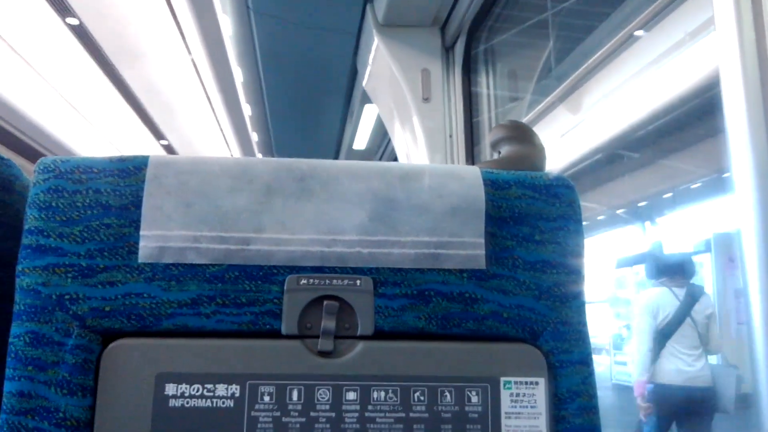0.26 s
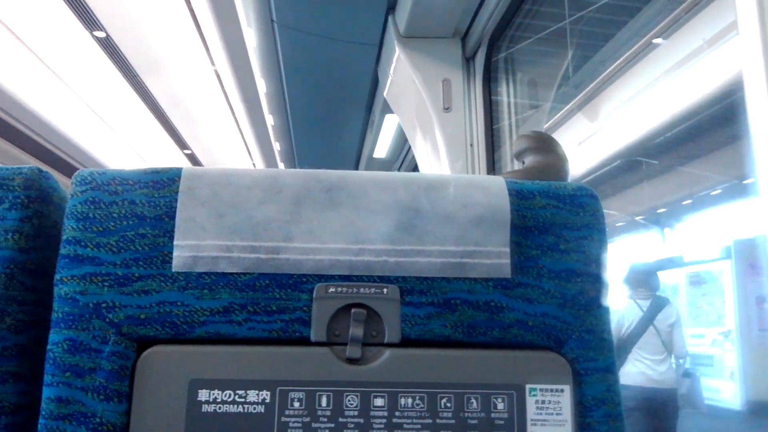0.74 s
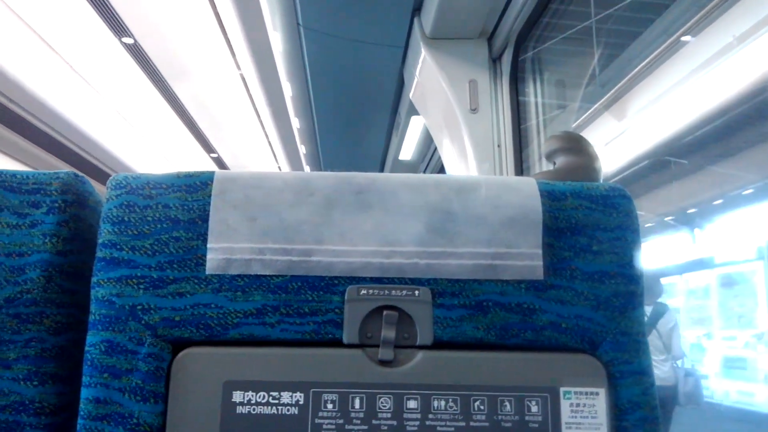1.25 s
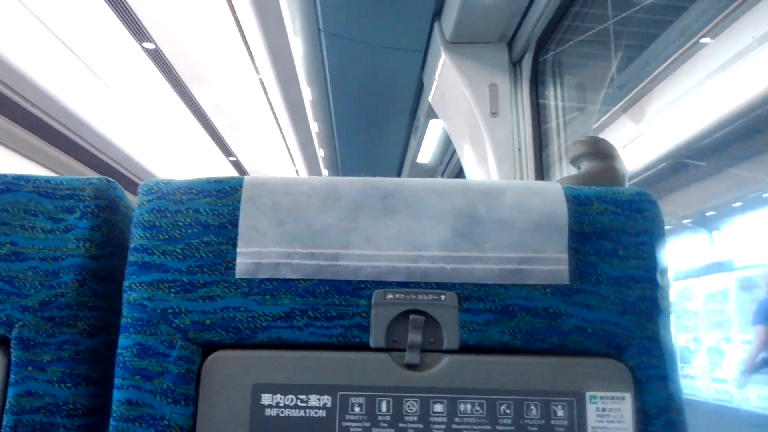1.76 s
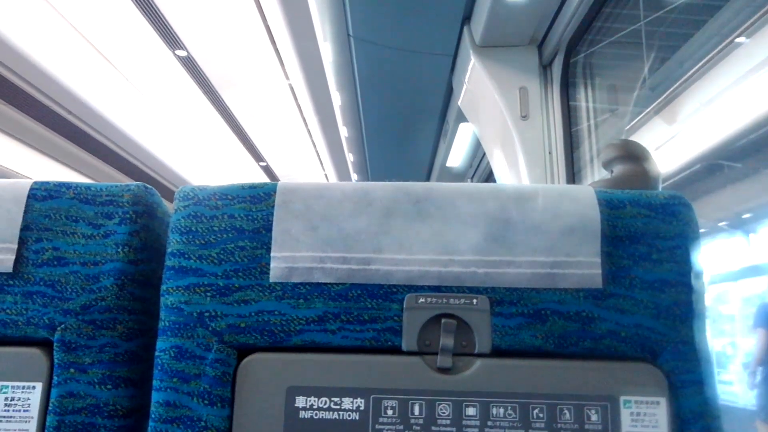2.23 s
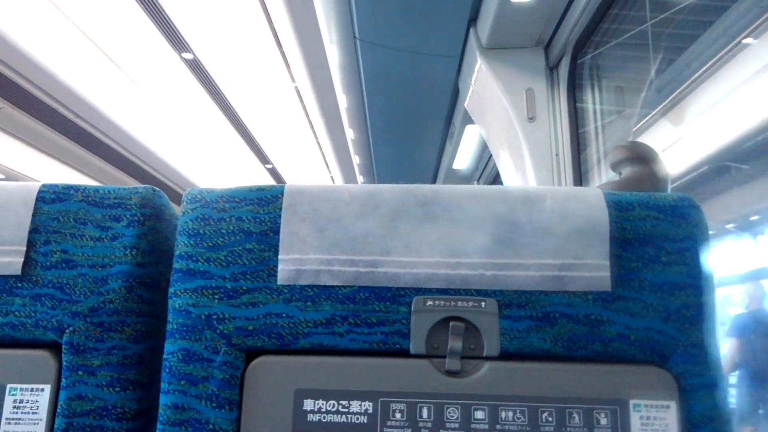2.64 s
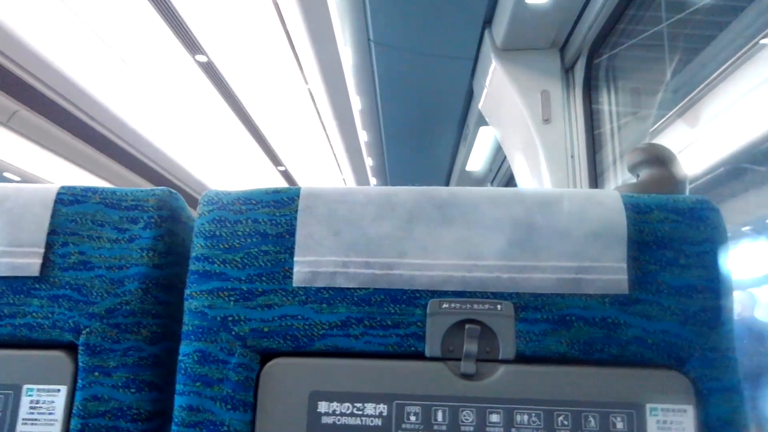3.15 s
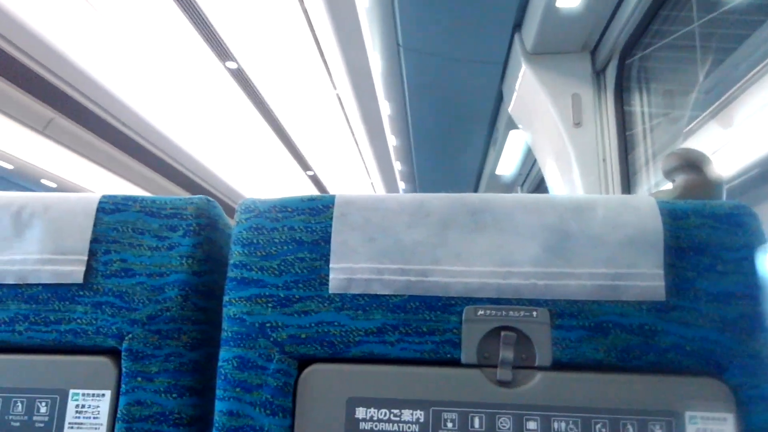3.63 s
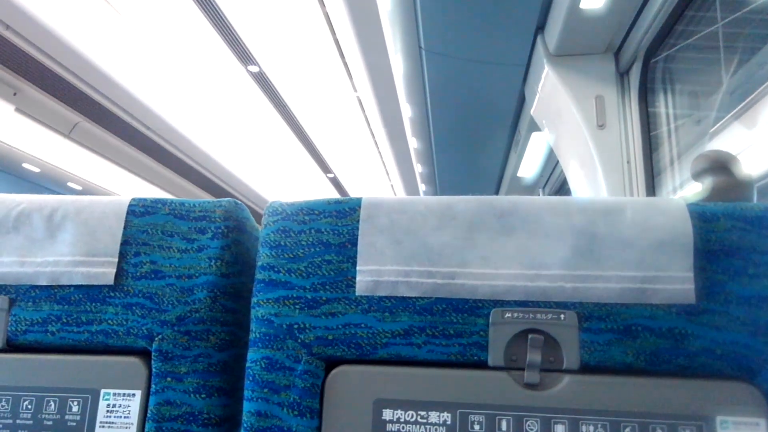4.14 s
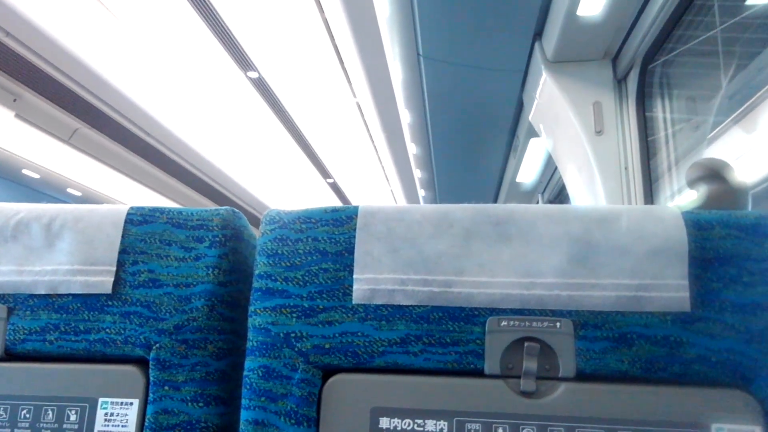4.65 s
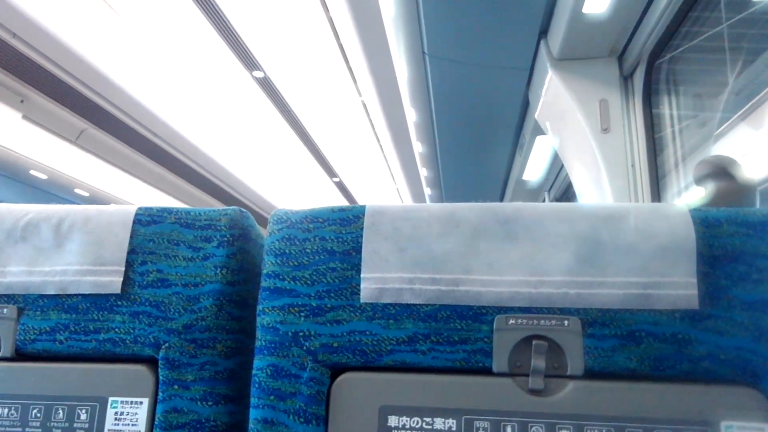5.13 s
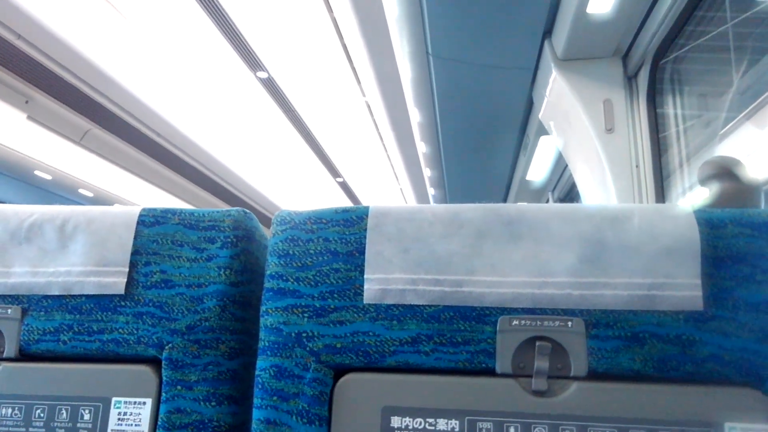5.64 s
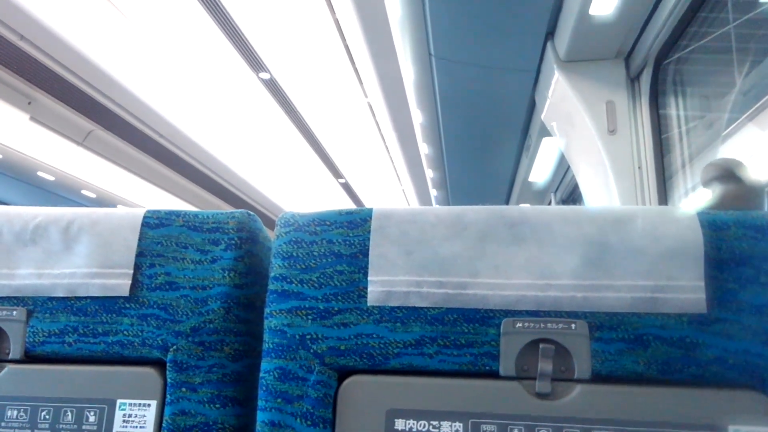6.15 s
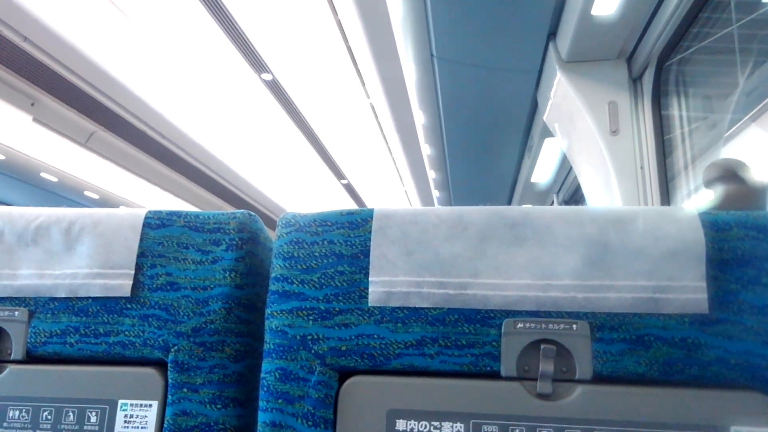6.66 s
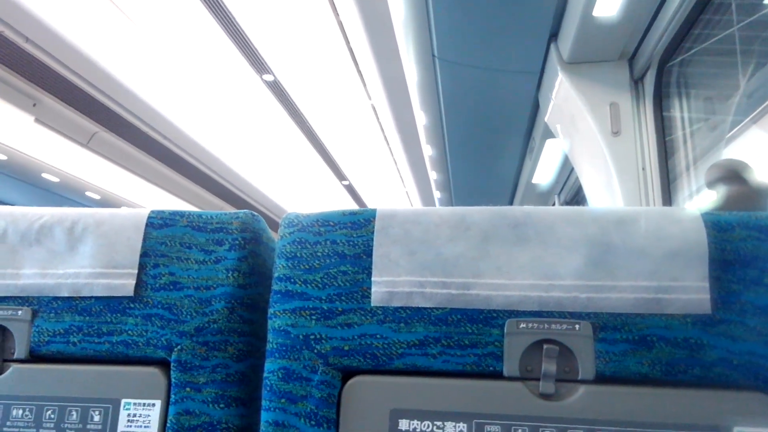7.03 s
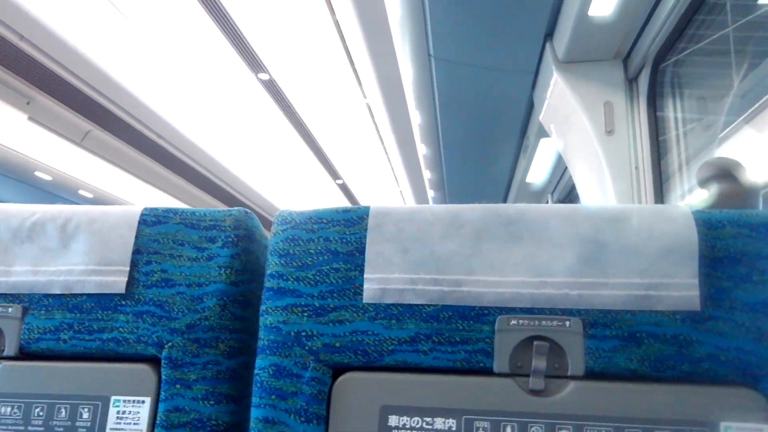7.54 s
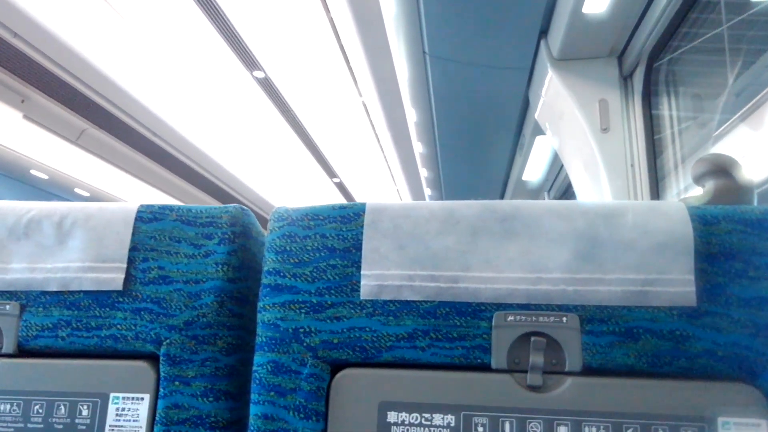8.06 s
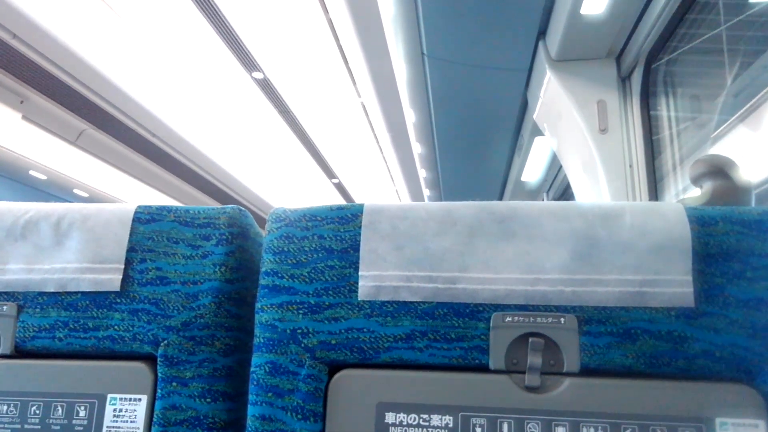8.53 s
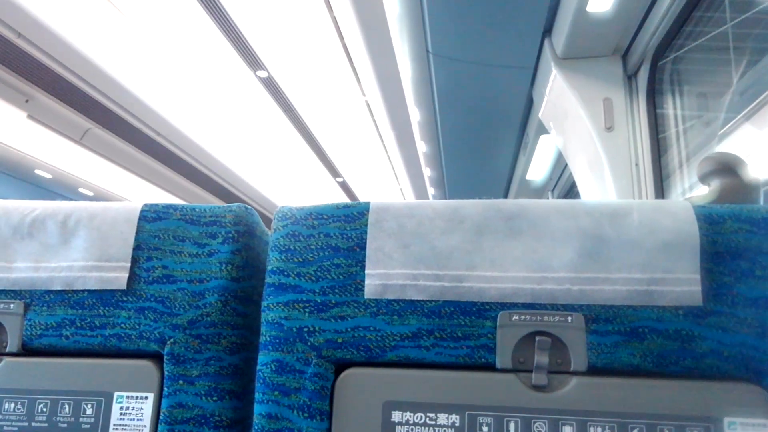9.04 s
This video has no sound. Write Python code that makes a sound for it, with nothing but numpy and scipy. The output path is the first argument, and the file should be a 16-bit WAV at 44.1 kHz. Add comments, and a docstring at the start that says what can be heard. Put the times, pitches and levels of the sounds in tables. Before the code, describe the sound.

A steady low hum fills the cabin of a stationary electric train for about nine seconds, heard from one microphone inside. Fan and compressor motors drone under the floor, slowly swelling and easing over a deep body rumble. Air rushes softly through the ceiling ducts, and a very faint high electrical whine sits far behind. From the start until about 5.5 seconds, cloth rustles quietly close by and small things tick irregularly, a little more clearly around 0.4, 2 and 2.9 seconds. At 5.3 seconds something knocks once, sharply, on a panel, with a brief cabin echo. Only a few faint ticks follow. From 8.5 seconds a light metal part makes four short, quiet scrapes, the last two slightly lower, along with one last soft rustle. The hum grows slightly stronger toward the end.

```python
"""Inside a standing electric train car, one microphone. From the start, fan and compressor motors
drone under the floor, the body rumbles, air rushes through the ceiling ducts and an inverter whines
faintly. Close by, cloth rustles as its fibres slip, and small things tick. At 5.3 s something knocks
once on a panel and the cabin echoes briefly. From 8.5 s a light metal part scrapes four times,
friction exciting its resonances, with one last rustle."""
import sys
import numpy as np
from scipy import signal
from scipy.fft import rfft, irfft, next_fast_len
from scipy.io import wavfile
from scipy.ndimage import uniform_filter1d

SR = 44100
rng = np.random.default_rng(int(sys.argv[2]) if len(sys.argv) > 2 else 0)


def inscribe(sig):
    """Save sig as 16-bit PCM at rate SR to the path in sys.argv[1].

    A 1-D sig is mono; a 2-D sig holds one channel per row.
    Samples are clipped to [-1, 1] before scaling.
    """
    pcm = np.round(np.clip(np.atleast_2d(sig).T, -1, 1) * 32767)
    wavfile.write(sys.argv[1], SR, pcm.astype(np.int16))


N = 409688


def undb(db):
    """Gain of a level in dB."""
    return 10 ** (np.asarray(db) / 20)


def unit(x):
    """x scaled to rms 1."""
    return x / np.sqrt(np.mean(x ** 2))


def colour(x, spectrum, bumps=()):
    """x shaped by (Hz, dB) points and (Hz, width Hz, dB) bells; white noise keeps its rms."""
    size = next_fast_len(N)
    hz = np.maximum(np.arange(size // 2 + 1) * SR / size, .1)
    points_hz, points_db = np.transpose(spectrum)
    shape_db = np.interp(np.log(hz), np.log(points_hz), points_db, left=-90, right=-90)
    for centre_hz, width_hz, bump_db in bumps:
        shape_db += bump_db / (1 + (2 * (hz - centre_hz) / width_hz) ** 2)
    return irfft(rfft(x, size) * unit(undb(shape_db)), size)[:N]


def wander(per_s):
    """A smooth random curve of rms 1, drawn through per_s values a second."""
    hold = int(SR / per_s)
    steps = np.repeat(rng.standard_normal(N // hold + 1), hold)
    return unit(uniform_filter1d(uniform_filter1d(steps, hold), hold)[:N])


def sine(hz, drift_hz=0.):
    """A tone of rms 1 whose pitch may wander."""
    turns = np.cumsum(hz + drift_hz * wander(2.)) / SR
    return np.sqrt(2) * np.sin(2 * np.pi * (turns + rng.random()))


def add(out, start_s, piece):
    """Mixes a piece into out at start_s."""
    i = int(start_s * SR)
    out[i:i + len(piece)] += piece[:N - i]


# The two strong drones under the floor. Each row: time in seconds, low and high drone in dB rms.
DRONE_LEVELS = [(0.0, -29.5, -25.5), (1.25, -27.5, -26.0), (1.7, -30, -27), (2.3, -30.5, -30.5),
                (3.1, -31.0, -31.5), (4.1, -31, -27), (5.2, -29, -26.5), (5.9, -31.5, -28), (7.5, -34, -28),
                (8.5, -33.5, -24.5), (9.29, -33, -23.5)]
# Weaker machine tones. Each row: frequency in Hz, level in dB, waver in dB.
MACHINE_TONES = [(31.22, -50, 2), (114.05, -47, 1.5), (114.85, -49.5, 1.5), (116.6, -54, 2),
                 (174.9, -57, 2), (229.7, -61, 3), (344.3, -74, 3), (360.0, -73, 2), (1003.1, -76, 2),
                 (1004.25, -75, 2)]


def motors(low_hz=29.52, high_hz=58.32):
    """Under the floor, fan and compressor motors swell slowly; close pairs of weaker tones throb."""
    t = np.arange(N) / SR
    times, low_db, high_db = np.transpose(DRONE_LEVELS)
    weak = sum(undb(db + waver_db * wander(1.6)) * sine(hz, drift_hz=0.083)
               for hz, db, waver_db in MACHINE_TONES)
    low = undb(np.interp(t, times, low_db)) * sine(low_hz)
    high = undb(np.interp(t, times, high_db)) * sine(high_hz)
    return low + high + weak


# The body's deepest sway, then the rumble above it. Each row: frequency in Hz, relative level in dB.
SWAY_SPECTRUM = [(3, -25), (7, -2), (20, 0), (40, -5), (50, -4), (62, -9)]
RUMBLE_SPECTRUM = [(76, -4), (95, -13.5), (135, -5), (175, -13), (210, -19.5), (300, -24), (420, -32),
                   (600, -40.5)]


def car_body(level_db=-36):
    """All around the microphone, the car body sways and rumbles almost steadily."""
    gain = undb(level_db + .5 * wander(0.74))
    return gain * colour(rng.standard_normal(N), SWAY_SPECTRUM + RUMBLE_SPECTRUM)


# Air flow and microphone hiss. Each row: frequency in Hz, relative level in dB.
AIR_SPECTRUM = [(300, -11.5), (600, -8), (760, 0), (1000, -3), (1300, -5.5), (2000, -7), (2600, -10.5),
                (3500, -17.5), (4500, -21.5), (5600, -24), (7000, -32), (10000, -39.5), (11700, -35),
                (13500, -36.5), (16000, -36.5)]
# Duct resonances and dips. Each row: centre in Hz, width in Hz, gain in dB.
DUCT_RESONANCES = [(1113, 68, 8.5), (1133.5, 30, -14), (1224, 41, 5), (1362, 56, -10.5), (1517, 150, 3.5),
                   (1648, 100, -4.5), (1930, 62, 1.5)]


def duct_air(level_db=-55):
    """Overhead, rushing air takes on the resonances of the ducts; its level wanders a little."""
    gain = undb(level_db + 0.3 * wander(2.3) + 0.72 * wander(7.7))
    return gain * colour(rng.standard_normal(N), AIR_SPECTRUM, DUCT_RESONANCES)


# Soft, hard and soft contacts of one knock. Each row: start in seconds, level in dB, contact in seconds.
KNOCK_BLOWS = [(5.282, -23.5, 0.0037), (5.301, -35, .0002), (5.311, -26, .003)]
# The struck panel. Each row: frequency in Hz, relative level in dB, seconds to fall 60 dB.
PANEL_MODES = [(162, -2, .07), (273, -6, 0.032), (630, -5, .07), (980, -9, 0.036), (1270, -10, 0.054),
               (1770, -13, .05), (2530, -19, .05), (4800, -10, .07)]
# The contact stiffens. One row: start and length in seconds, level in dB, first and last pitch in Hz.
CONTACT_SQUEEZE = (5.286, .023, -45, 520, 1050)
# The cabin's echo. Each row: frequency in Hz, relative level in dB.
ECHO_SPECTRUM = [(400, -20), (800, -1), (1500, -0.5), (2600, -3), (4000, -15), (6000, -25)]


def knock(echo_db=-43.5, echo_t60_s=0.16):
    """Close by, a touch hardens into a blow; the panel rings and the cabin scatters a short echo."""
    t = np.arange(SR // 4) / SR
    ring = sum(undb(db - 60 * t / t60) * np.sin(2 * np.pi * hz * t) for hz, db, t60 in PANEL_MODES)
    direct, echo_envelope = np.zeros(N), np.zeros(N)
    for start, db, contact_s in KNOCK_BLOWS:
        # a longer contact leaves out the high modes
        blow = np.convolve(ring, np.hanning(int(contact_s * SR) + 3))
        add(direct, start, undb(db) * blow / np.max(np.abs(blow)))
    start, length, db, from_hz, to_hz = CONTACT_SQUEEZE
    size = int(length * SR)
    sweep = np.sin(2 * np.pi * np.cumsum(np.geomspace(from_hz, to_hz, size)) / SR)
    add(direct, start, undb(db) * np.sqrt(2 * np.hanning(size)) * sweep)
    roughness = 1 + 0.23 * wander(900.)
    hard_blow_s = KNOCK_BLOWS[1][0]
    add(echo_envelope, hard_blow_s, (1 - np.exp(-t / 0.0027)) * undb(-60 * t / echo_t60_s))
    echo = colour(echo_envelope * rng.standard_normal(N), ECHO_SPECTRUM)
    return direct * roughness + undb(echo_db) * echo


# Body and high sheen of rustles and ticks. Each row: frequency in Hz, relative level in dB.
BODY_SPECTRUM = [(1200, -12), (2500, 1.5), (4000, -3.5), (5000, -1), (5550, 0), (6200, -10.5),
                 (8000, -14.5), (9500, -26), (12000, -45)]
SHEEN_SPECTRUM = [(4000, -25), (5500, -2), (7500, -3), (9500, -5), (11600, 0), (13000, -5), (14200, -9),
                  (16000, -8)]


def close_noise(body, sheen):
    """The noise of small movements near the microphone, under one envelope each for body and sheen."""
    dull = colour(body * rng.standard_normal(N), BODY_SPECTRUM)
    bright = colour(sheen * rng.standard_normal(N), SHEEN_SPECTRUM)
    return dull + bright


# Swells of moving cloth. Each row: start and length in seconds, level in dB, relative sheen in dB.
RUSTLE_SWELLS = [(0.029, 0.091, -60, -15), (0.296, 0.22, -66, -17), (0.662, .16, -71.5, -19),
                 (1.07, 0.1, -71.5, -22), (1.331, .06, -66, -3), (1.47, .07, -67, -20),
                 (1.553, .045, -68.5, 1), (1.865, 0.17, -67.5, -22), (1.984, 0.06, -64, -20),
                 (2.288, 0.19, -66, -20), (2.747, 0.064, -62, -5), (2.797, 0.087, -66.5, -12),
                 (2.868, 0.1, -59.5, -22), (3.305, .17, -67, -12), (3.695, .05, -69.5, -4),
                 (3.745, .12, -61, -18), (3.839, 0.11, -61.5, -16), (3.925, 0.25, -65.5, -24),
                 (4.482, .18, -70, -19), (4.661, .14, -66, -16), (5.321, .1, -64.5, -13),
                 (8.854, 0.28, -68, -23)]


def cloth_rustle(slips_per_s=120, slip_decay_s=.004):
    """Close by, fibres slip in dense crackles that die away quickly, over a finer hiss."""
    body, sheen = np.zeros(N), np.zeros(N)
    long_faint_swell = (0, 5.8, -75, -16.5)
    for start, length, db, sheen_db in [long_faint_swell] + RUSTLE_SWELLS:
        swell = np.sqrt(np.hanning(int(length * SR)))
        add(body, start, undb(db) * swell)
        add(sheen, start, undb(db + sheen_db) * swell)
    slips = (rng.random(N) < slips_per_s / SR) * undb(rng.exponential(size=N))
    crackle = signal.lfilter([1], [1, -np.exp(-1 / (slip_decay_s * SR))], slips)
    grain = unit(1.6 + crackle)  # the steady part is the hiss
    return close_noise(body * grain, sheen * grain)


# Small things ticking; the tick at 5.30 s is the sharp click of the knock's hard blow. Each row: start in
# seconds, level in dB, relative sheen in dB.
SMALL_TICKS = [(0.0533, -56, -21), (0.3516, -58, -22), (0.3805, -56, -15), (0.403, -50, -22),
               (0.4459, -56, -26), (0.4833, -61, -22), (0.6794, -59.5, -18.5), (1.1094, -61, -22),
               (1.5623, -58, -6.5), (1.8995, -58.5, -25), (1.9875, -49.5, -21), (2.7563, -54, -3),
               (2.7683, -61, 5.5), (2.814, -60.5, -24), (2.8834, -51.5, -31), (2.928, -48.5, -18),
               (3.3294, -64, -10), (3.4892, -57.5, -9), (3.5138, -61, -8), (3.704, -63, -10),
               (4.0998, -59.5, -21), (4.138, -56, -23), (4.675, -56.5, -26), (4.7464, -60, -15),
               (5.1096, -63, -16), (5.3016, -44.5, -24), (5.3394, -61, -6.5), (5.3844, -56.5, -14),
               (5.6388, -60.5, -18), (6.029, -64.5, -20), (6.539, -60.5, -18), (7.2092, -67, -19),
               (7.83, -61.5, -19)]


def ticks(burst_t60_s=0.036, tail_t60_s=0.21, faint_per_s=2.1, faint_db=-70, faint_sheen_db=-19):
    """Close by, each tick is a sudden burst that the cabin draws out; faint ones come at random."""
    body, sheen = np.zeros(N), np.zeros(N)
    for start, db, sheen_db in SMALL_TICKS:
        add(body, start, undb([db]))
        add(sheen, start, undb([db + sheen_db]))
    faint = (rng.random(N) < faint_per_s / SR) * undb(faint_db + 1.5 * rng.standard_normal(N))
    body += faint
    sheen += undb(faint_sheen_db) * faint
    t = np.arange(SR // 4) / SR
    attack = 1 - np.exp(-t / .0005)
    cabin_tail = undb(-11 - 60 * t / tail_t60_s)
    envelope = attack * (undb(-60 * t / burst_t60_s) + cabin_tail)
    return close_noise(signal.oaconvolve(body, envelope)[:N], signal.oaconvolve(sheen, envelope)[:N])


# Scrapes. Each row: start and length in seconds, level in dB, extra grip at first in dB, pitch factor.
SCRAPE_STROKES = [(8.548, .015, -70, 6, 1.0), (8.675, .135, -64, 11, 1.005), (8.95, .14, -67, 0, .955),
                  (9.12, .08, -70, 0, .95)]
# The light metal part. Each row: resonance in Hz, width in Hz, gain in dB.
METAL_MODES = [(3010, 360, 26), (3890, 360, 23), (4720, 400, 18)]


def metal_scrape(grip_ease_s=.012, edge_s=.003):
    """Close by, uneven friction excites a metal part's resonances; the later scrapes are lower."""
    out = np.zeros(N)
    for start, length, db, grip_db, pitch in SCRAPE_STROKES:
        t = np.arange(int(length * SR)) / SR
        soft_ends = np.clip(np.minimum(t, length - t) / edge_s, 0, 1)
        drag = np.zeros(N)
        add(drag, start, undb(db + grip_db * np.exp(-t / grip_ease_s)) * soft_ends)
        modes = [(hz * pitch, width_hz, gain_db) for hz, width_hz, gain_db in METAL_MODES]
        out += colour(drag * rng.standard_normal(N), [(1500, -40), (8000, -40)], modes)
    unevenness = unit(undb(1.5 * wander(150.) + 1.2 * wander(25.)))
    return out * unevenness


# The inverter's whine. Each row: multiple of the output frequency, level in dB rms.
WHINE_HARMONICS = [(59, -93), (60, -89), (61, -88), (62, -91), (63, -85), (64, -89), (120, -102),
                   (166, -106), (179, -103), (180, -100), (181, -100), (189, -93), (190, -91), (192, -105),
                   (221, -104), (222, -104), (225, -106), (240, -103), (241, -101), (242, -104)]


def inverter(output_hz=63.016):
    """Far in the background, high multiples of the inverter's output tremble together in pitch."""
    turns = output_hz * np.cumsum(1 + 3e-5 * wander(3.)) / SR
    return sum(undb(db) * np.sqrt(2) * np.sin(2 * np.pi * (multiple * turns + rng.random()))
               for multiple, db in WHINE_HARMONICS)


def scene():
    """The steady sound of the car and the small events close by, at one microphone in the cabin."""
    steady = motors() + inverter() + car_body() + duct_air()
    nearby = cloth_rustle() + ticks() + knock() + metal_scrape()
    return (steady + nearby)[None, :]


def record(dry):
    """The recorder cuts the top steeply above 15.7 kHz."""
    return signal.sosfilt(signal.ellip(12, .2, 80, 15720, fs=SR, output="sos"), dry)


dry = scene()
out = record(dry)
inscribe(out)
```